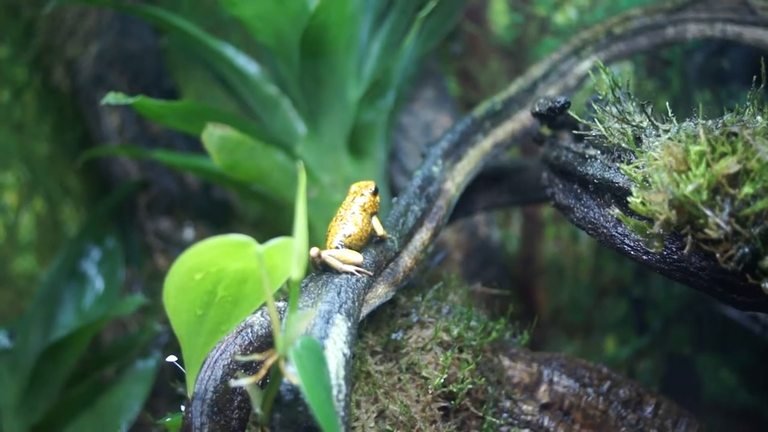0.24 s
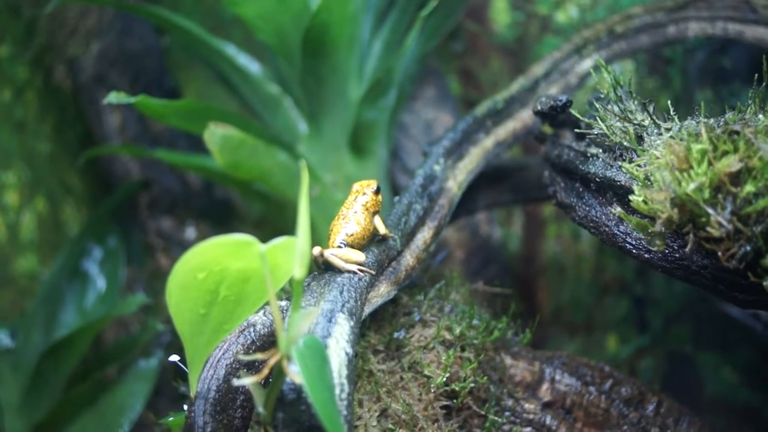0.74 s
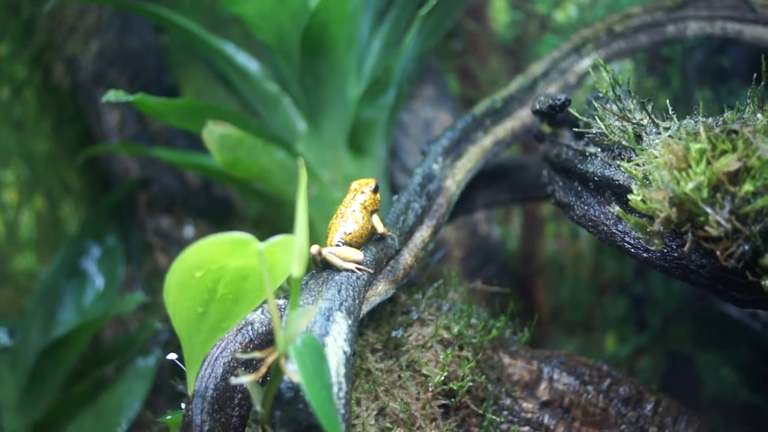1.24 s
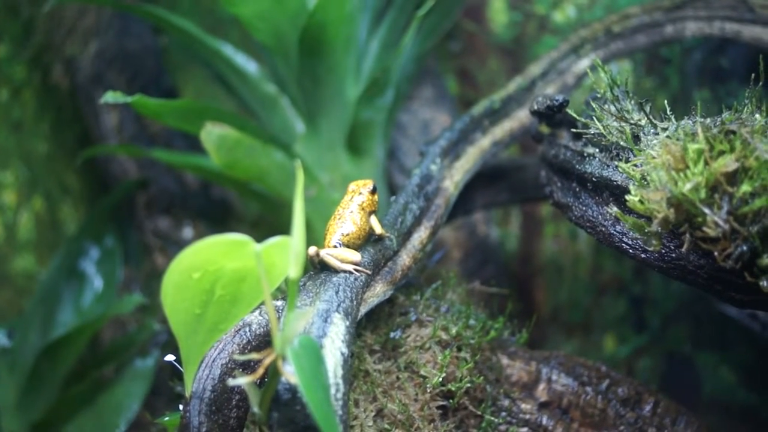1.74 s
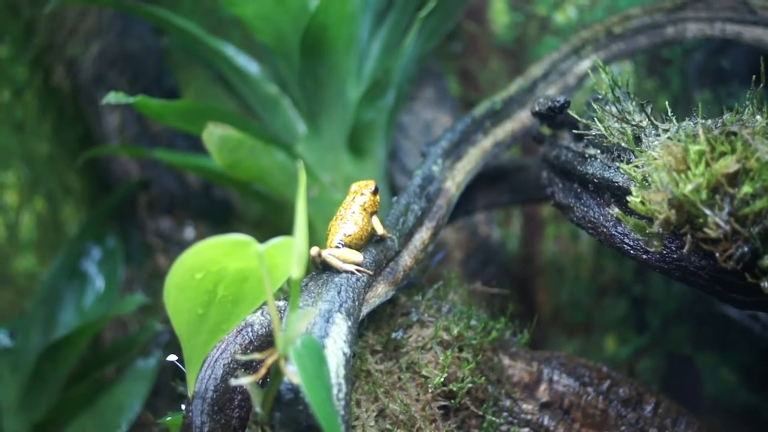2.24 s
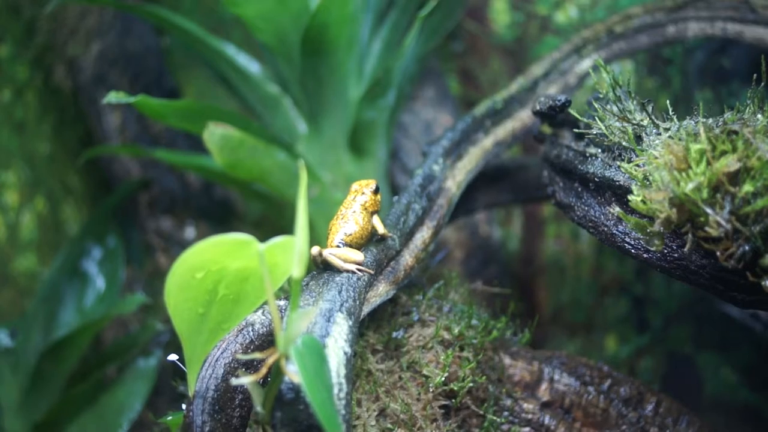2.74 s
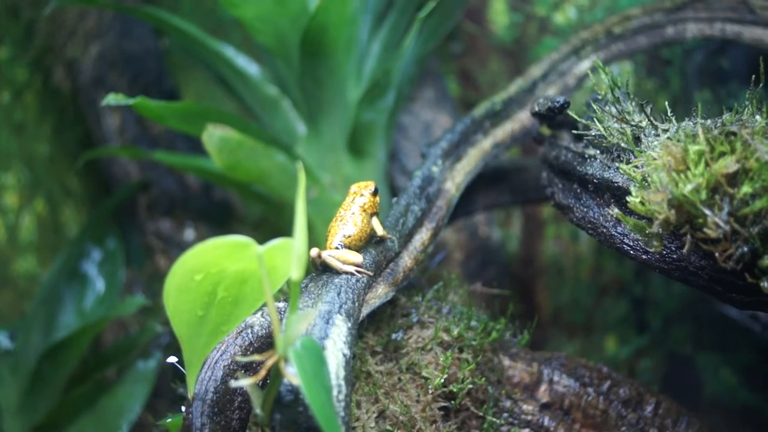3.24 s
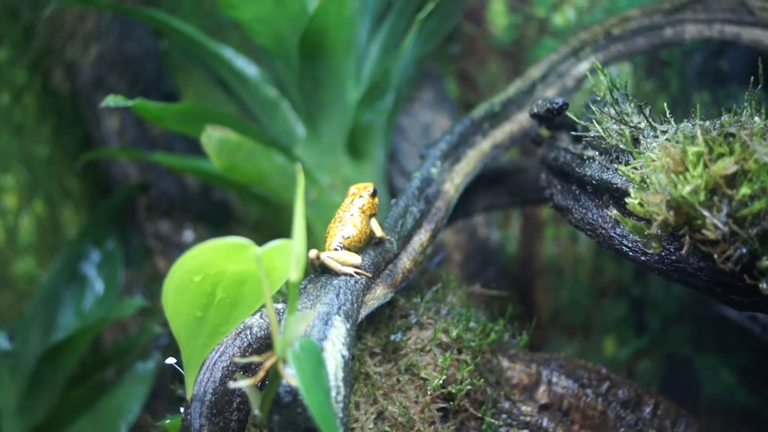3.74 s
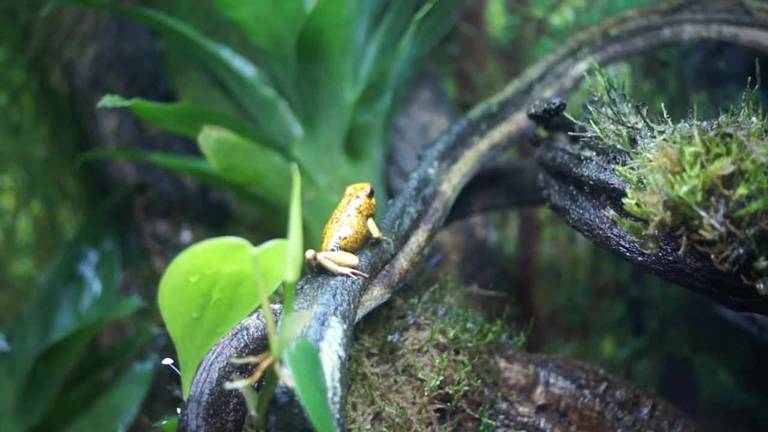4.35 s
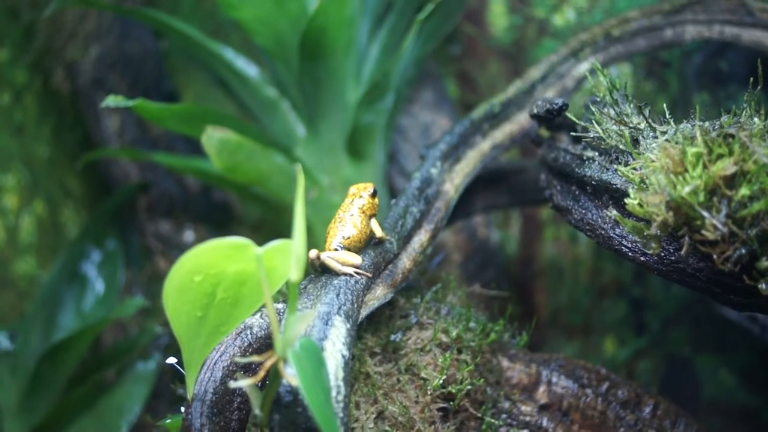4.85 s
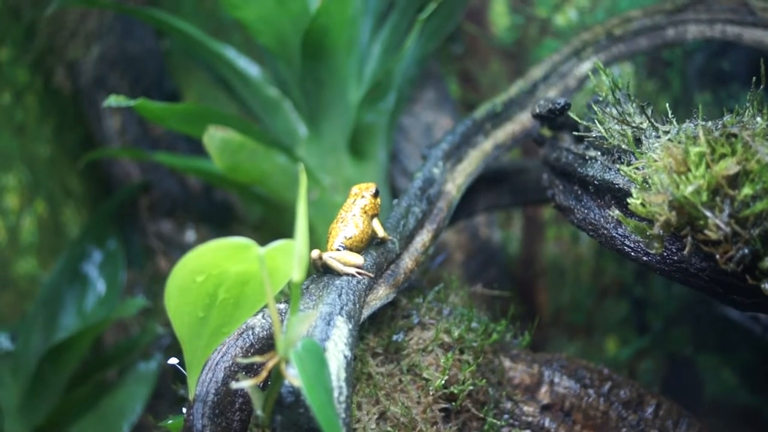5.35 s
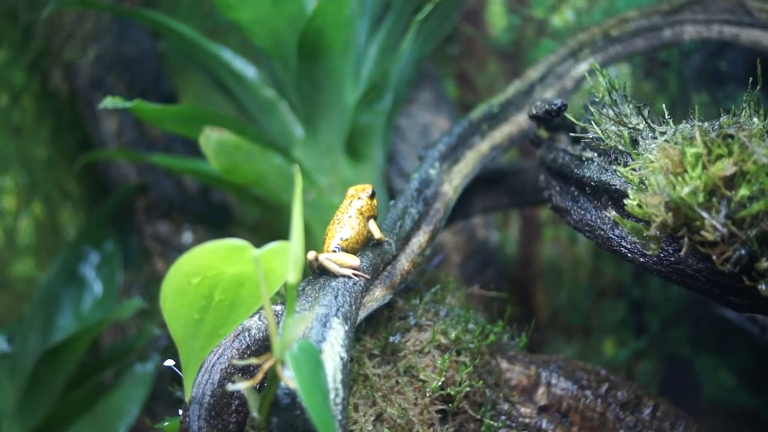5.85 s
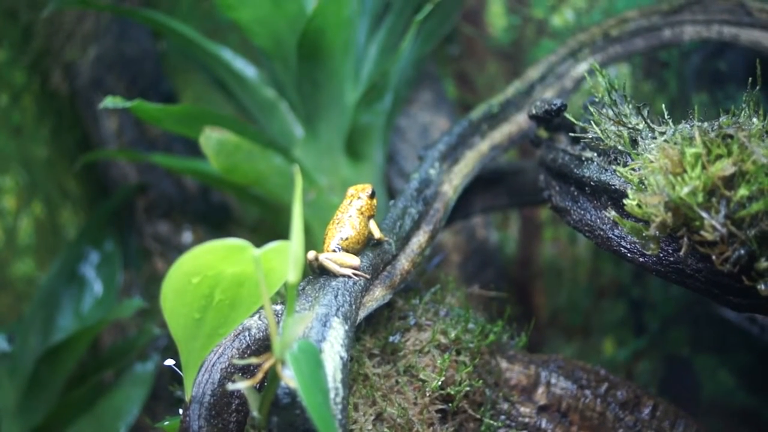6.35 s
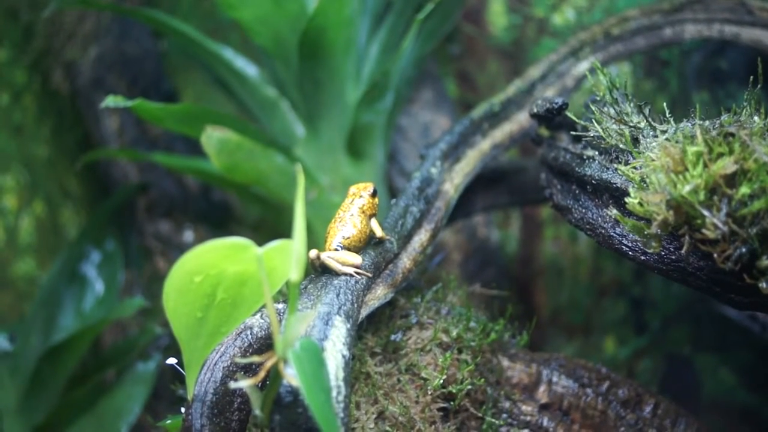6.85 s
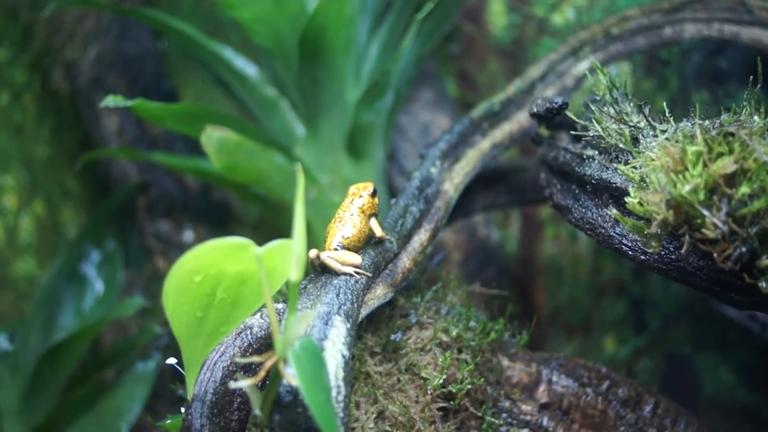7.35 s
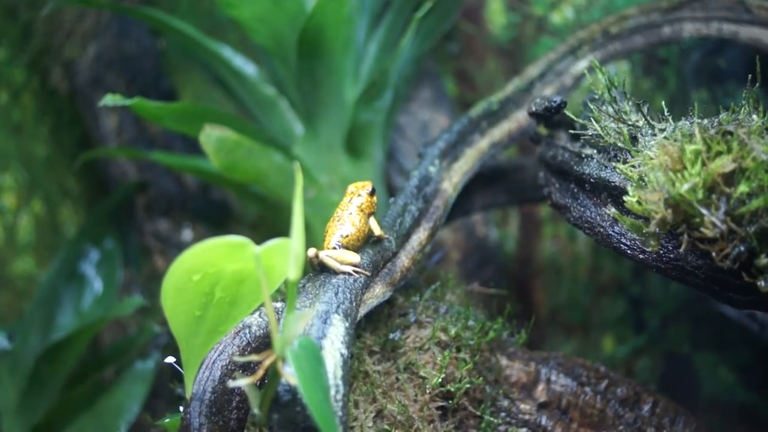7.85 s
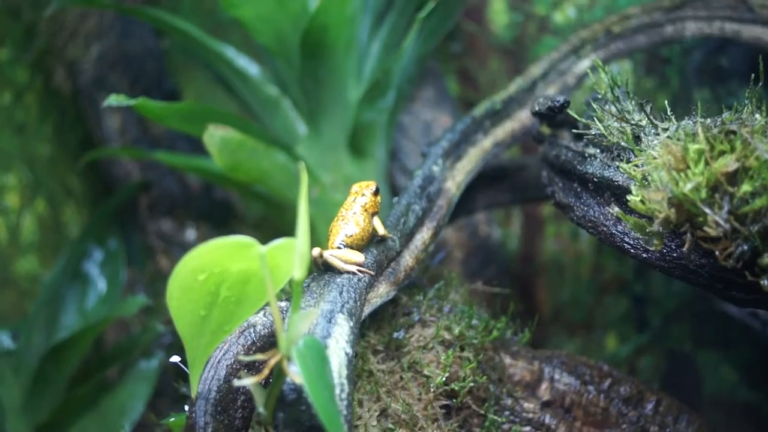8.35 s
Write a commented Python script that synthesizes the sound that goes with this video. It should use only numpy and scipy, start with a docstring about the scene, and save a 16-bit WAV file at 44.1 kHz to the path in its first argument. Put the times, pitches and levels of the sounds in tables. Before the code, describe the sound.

A small frog in a glass terrarium repeats short, high, raspy chirps in a fast, even rhythm over a faint fan.

```python
"""A small frog on a branch in a glass terrarium rasps about five times a second.
Each rasp is a swelling, quickening train of vocal-cord slaps mixed with air noise. This source is
filtered by the resonances of throat and tank, joined by puffs of air and a faint rising resonance,
and prolonged by the room's reverberation. A fan rushes and hums behind.
The recorder's response has three notches and cuts the highest treble."""
import sys
import numpy as np
from scipy import signal
from scipy.fft import rfft, irfft, next_fast_len
from scipy.io import wavfile

SR = 44100
rng = np.random.default_rng(int(sys.argv[2]) if len(sys.argv) > 2 else 0)


def master(y):
    """Save y as 16-bit WAV."""
    cut = np.clip(np.atleast_2d(y).T, -1, 1)
    pcm = np.round(cut * 32767)  # scale
    wavfile.write(sys.argv[1], SR, pcm.astype(np.int16))


N = 378819

# rasps: start t/s, duration/s, relative level/dB
RASP_TIMES = [(-0.062, 0.091, -1.5), (0.152, 0.098, -2.5), (0.372, 0.089, -1.6), (0.585, 0.098, -2.5),
              (0.805, 0.094, -1.7), (1.02, 0.093, -1.5), (1.233, 0.096, -2.5), (1.446, 0.088, -1),
              (1.664, 0.092, -0.6), (1.881, 0.093, -0.2), (2.094, 0.091, -1), (2.309, 0.089, -1.2),
              (2.514, 0.1, -1.8), (2.735, 0.098, -1.5), (2.951, 0.098, -1.5), (3.169, 0.09, -1.5),
              (3.388, 0.095, -1.6), (3.61, 0.089, -1.6), (3.829, 0.092, 0.2), (4.051, 0.093, 0),
              (4.274, 0.09, 0.5), (4.485, 0.094, -1.5), (4.711, 0.092, -1), (4.93, 0.088, -1),
              (5.146, 0.09, -0.4), (5.361, 0.092, -0.4), (5.57, 0.094, -0.9), (5.792, 0.097, -0.8),
              (6.021, 0.089, -0.5), (6.241, 0.091, -0.2), (6.462, 0.091, -0.7), (6.684, 0.091, 0),
              (6.899, 0.092, 0), (7.115, 0.092, 0.5), (7.333, 0.094, 0), (7.55, 0.085, -0.6),
              (7.76, 0.093, 0), (7.973, 0.097, 0.5), (8.194, 0.09, -1), (8.407, 0.093, 0.2)]
# bands that follow the effort, the vocal sac's most: low f/Hz, high f/Hz, swell/(dB per dB), gain/dB
SWELL_BANDS = [(1320, 2240, 0.65, -0.5), (2400, 3300, 3.5, -4), (2970, 3774, 0.92, -2.5),
               (3978, 5015, 2.2, -3.5)]
# cancellations by reflections off the glass: f/Hz, width/Hz, depth (0-1)
GLASS_NULLS = [(1760, 120, .6), (2245, 50, .7), (3025, 90, .55), (3172, 70, .8), (3420, 170, .8),
               (4640, 120, .6)]
# resonances of throat and tank: f/Hz, width/Hz, left gain/dB, right gain/dB
TANK_MODES = [(1850, 39, -20, -5), (1934.5, 74, -0.5, -3), (1993, 76, -32, -7), (2086, 40.6, -4, -4),
              (2150, 120, -9, -5.5), (2312, 144, -13.5, -11.5), (2388, 60, -20, -18), (2441, 95, -7.5, -3),
              (2493, 46, -2, -0.5), (2605.4, 38, -1.5, 0.5), (2636.5, 23, -45, -3), (2701.5, 69, -2, -7),
              (2783, 103, -10, -14), (2897, 44, -2.5, 1), (3010, 100, -17, -29), (3068, 69, -10.5, -8.5),
              (3285, 200, -13, -11.5), (3534, 140, -15.5, -11), (3650, 30, -9, -11),
              (3795, 144, -14.5, -17.5), (3928, 69, -23, -16.5), (4032, 140, -24, -22),
              (4150, 32, -23.5, -16.5), (4260, 120, -31, -20.5), (4403, 140, -22.5, -25),
              (4510, 21, -23, -23), (4840, 35, -28, -33.5)]
# tank modes driven by the upper resonance: f/Hz, width/Hz, left gain/dB, right gain/dB
HIGH_TANK_MODES = [(8440, 20.6, -15, 13.5), (8680, 47, 4.5, -14), (8925, 31, -52.5, 5),
                   (10000, 36, -20, -25), (9146, 49, -18, -43)]
# room modes that ring on after each rasp: f/Hz, width/Hz, left gain/dB, right gain/dB
ROOM_MODES = [(2542, 15, -5, -13), (2700, 57, -11, -13), (2660, 16, -4, -10), (2860, 11, 0, -4),
              (3030, 31, -9, -20)]
# spectrum of the fan's rush: f/Hz, mid spectral level/dB, side relative to mid/dB
RUSH_SPECTRUM = [(30, -114, 10), (65.6, -102, 4), (108, -101, 2), (148, -95, 2.5), (520, -85, 3),
                 (620, -83, 1), (777, -88, 6), (1234, -76, -5), (1454, -79.5, -1), (2120, -88, 0.5),
                 (2400, -101.5, -51), (2760, -88.5, -1), (3300, -104, -1), (3970, -97, 2.5),
                 (4550, -104, 1), (7900, -111.5, 0.5), (11100, -115.5, 1.7), (14800, -120, -5),
                 (15300, -125, 14)]
# course of the fan's rush: t/s, relative level/dB
RUSH_LEVEL = [(0, 0), (6.5, 0), (7.8, 1), (8.59, 1)]
# hum lines of the fan: f/Hz, level/dB, waver rate/Hz
HUM_LINES = [(48, -80, 0.72), (161, -80, 3), (202.7, -74.5, 3.6), (354.6, -72, 4.3), (395.7, -70.5, 1.94)]
# notches in the recorder's response: f/Hz, width/Hz, depth (0-1)
RECORDER_NOTCHES = [(690, 250, .92), (1622, 1750, .972), (9840, 500, .85)]

START_DB, TOP_DB = -15, -5.5      # vocal effort at the foot and top of the swell


def from_db(db):
    """Amplitude ratio for a level in decibels."""
    return 10 ** (np.asarray(db) / 20)


def unit_rms(x):
    """Normalisation to unit mean power."""
    return x / np.sqrt(np.mean(x ** 2) + 1e-20)


def slow_noise(rate_hz):
    """Random fluctuation: unit-power noise through two one-pole low-passes."""
    pole = np.exp(-2 * np.pi * rate_hz / SR)
    return unit_rms(signal.lfilter([1], [1, -2 * pole, pole ** 2], rng.standard_normal(N + SR))[SR:])


def narrowband_noise(phase, rate_hz):
    """Quadrature modulation: two slow noises spread a carrier into a band."""
    return slow_noise(rate_hz) * np.cos(phase) + slow_noise(rate_hz) * np.sin(phase)


def resonance(x, hz, width_hz):
    """Damped resonator: two poles, unit gain at the peak."""
    r = np.exp(-np.pi * width_hz / SR)
    gain = (1 - r * r) / 2
    feedback = [1, -(1 + r * r) * np.cos(2 * np.pi * hz / SR), r * r]
    return signal.lfilter([gain, 0, -gain], feedback, x + 1e-18)


def bandpass(x, low_hz, high_hz):
    """Second-order Butterworth band-pass."""
    return signal.sosfilt(signal.butter(2, [low_hz, high_hz], "band", fs=SR, output="sos"), x + 1e-18)


def modal_response(x, modes):
    """Superposition: each mode resonates with its own strength left and right."""
    return sum(from_db(sides_db)[:, None] * resonance(x, hz, width) for hz, width, *sides_db in modes)


def cancel(x, notches):
    """Destructive interference: subtracting a resonance leaves a notch."""
    for hz, width_hz, depth in notches:
        x = x - depth * resonance(x, hz, width_hz)
    return x


def vocal_cords(progress, jitter=0.07, spread_db=1.2, throb_depth=0.46):
    """Relaxation oscillation: the cords slap ever faster, a little unevenly, and modulate the airflow."""
    rate_hz = np.interp(progress, (0.38, 0.8), (185, 320)) * (1 + jitter * slow_noise(120))
    cycles = np.cumsum(rate_hz) / SR
    onsets = np.diff(progress, prepend=0) < 0
    cycles = cycles - np.maximum.accumulate(cycles * onsets) - 0.4      # first slap 0.4 cycles in
    strikes = np.diff(np.floor(cycles), prepend=0) > 0
    slaps = strikes * np.sqrt(SR / rate_hz) * from_db(spread_db * rng.standard_normal(N))
    throb = 1 + throb_depth * np.cos(2 * np.pi * cycles)
    return unit_rms(slaps), unit_rms(throb)


def voice(slaps, airflow, effort_db, breath_share=0.4, skirt_hz=250):
    """Source and filter: slaps and breath noise excite the resonances of throat and tank."""
    breath = airflow * rng.standard_normal(N)
    source = np.sqrt(1 - breath_share) * slaps + np.sqrt(breath_share) * breath
    drive = 0
    for low_hz, high_hz, swell, gain_db in SWELL_BANDS:
        band = bandpass(unit_rms(source * from_db(swell * effort_db)), low_hz, high_hz)
        drive = from_db(gain_db) * band - drive      # alternating signs join the bands without a gap
    drive = cancel(drive, GLASS_NULLS)
    out = np.zeros((2, N))
    for hz, width_hz, *sides_db in TANK_MODES:
        near_mode = resonance(drive, hz, skirt_hz)      # keeps the valleys between modes deep
        out += from_db(sides_db)[:, None] * resonance(near_mode, hz, width_hz)
    return from_db(-18) * out


def between_panes(x, round_trip_s=0.00517, reflection=0.54):
    """Comb filtering: sound bounces between two glass walls, weaker on every round trip."""
    loop = np.zeros(round(round_trip_s * SR) + 1)
    loop[0], loop[-1] = 1, reflection
    return signal.lfilter([1], loop, x)


def upper_resonance(airflow, progress, from_hz=6550, to_hz=8690):
    """A noise-driven resonance rises and grows as the sac fills, exciting the tank's high modes."""
    glide = np.sin(np.pi / 2 * np.clip(progress / 0.68, 0, 1)) ** 2
    phase = 2 * np.pi * np.cumsum(from_hz + (to_hz - from_hz) * glide) / SR
    fade_in_db = np.interp(progress, (0, 0.086), (-16, 0))
    growth_db = 4.5 * (progress - 1)
    upper = airflow * from_db(-67.5 + fade_in_db + growth_db) * narrowband_noise(phase, rate_hz=420)
    return from_db(-2) * between_panes(upper) + from_db(5) * modal_response(upper, HIGH_TANK_MODES)


def sizzle(airflow, effort_db, hz=13500, width_hz=350):
    """Resonant filtering of air noise: a thin, high hiss that follows the effort."""
    noise = airflow * from_db(effort_db - 56) * rng.standard_normal((2, N))
    return resonance(resonance(noise, hz, width_hz), hz, 2 * width_hz)


def puffs(airflow, effort_db, elapsed_s, remaining_s):
    """Air noise: an opening puff decays, a leak grows with effort, a closing puff ends the rasp."""
    opening = from_db(-5.5) * np.exp(-elapsed_s / 0.013)
    leak = from_db(-7 + 1.8 * (effort_db - TOP_DB))
    closing = from_db(3) * np.exp(-np.clip(remaining_s, 0, 1) / 0.0048)
    noise = airflow * from_db(-51) * (opening + leak + closing) * rng.standard_normal((2, N))
    return between_panes(bandpass(noise, 4800, 7280))


def voice_body(airflow, effort_db, swell=4.7):
    """Power-law growth: a faint low band of air noise emerges near full effort."""
    noise = airflow * from_db(swell * effort_db) * rng.standard_normal(N)
    return from_db(-61) * unit_rms(bandpass(noise, 864, 1510))


def frog(open_s=0.0012, shut_s=0.0022):
    """Amplitude modulation: in each rasp the throat opens, effort swells and holds, the throat shuts."""
    t = np.arange(N) / SR
    start_s, duration_s, level_db = np.transpose(RASP_TIMES)
    rasp = np.clip(np.searchsorted(start_s, t) - 1, 0, None)
    elapsed_s = t - start_s[rasp]
    remaining_s = duration_s[rasp] - elapsed_s
    progress = elapsed_s / duration_s[rasp]
    opened = np.clip(elapsed_s / open_s, 0, 1)
    shut = np.clip(-remaining_s / shut_s, 0, 1)
    effort_db = np.interp(progress, (0, 0.76), (START_DB, TOP_DB)) - 33 * (1 - opened) - 0.5 * shut
    gate = from_db(level_db[rasp]) * (shut < 1)
    slaps, throb = vocal_cords(progress)
    airflow = gate * throb
    tapered_flow = airflow * opened * (1 - shut) ** 2
    return (voice(gate * slaps, airflow, effort_db)
            + upper_resonance(tapered_flow, progress)
            + sizzle(airflow, effort_db)
            + puffs(tapered_flow, effort_db, elapsed_s, remaining_s)
            + voice_body(airflow, effort_db))


def room(x, delay_s=0.03, t60_s=0.23, rise_s=0.022):
    """Reverberation: a late return rings in narrow room modes over an exponentially decaying tail."""
    mono = x.mean(axis=0)
    late = np.pad(mono, (round(delay_s * SR), 0))[:N]
    t = np.arange(SR // 2) / SR
    envelope = from_db(-60 * t / t60_s) * (1 - np.exp(-t / rise_s))
    decay_energy = t60_s * SR / (6 * np.log(10))
    tail = from_db(-7) / np.sqrt(decay_energy) * envelope * rng.standard_normal((2, len(t)))
    return modal_response(late, ROOM_MODES) + signal.fftconvolve(mono[None], tail, axes=1)[:, :N]


def fan_rush(flicker_db=1.2):
    """Broadband noise: independent mid and side signals make a wide, slightly flickering rush."""
    size = next_fast_len(N)
    log_hz = np.log(np.maximum(np.arange(size // 2 + 1) * SR / size, 1))
    hz, mid_db, side_db = np.transpose(RUSH_SPECTRUM)
    gains = from_db([np.interp(log_hz, np.log(hz), db) for db in (mid_db, mid_db + side_db)])
    white = rfft(rng.standard_normal((2, size))) * np.sqrt(SR / 2)
    mid, side = irfft(white * gains, size)[:, :N]
    level_db = np.interp(np.arange(N) / SR, *np.transpose(RUSH_LEVEL)) + flicker_db * slow_noise(5.9)
    return np.array([mid + side, mid - side]) * from_db(level_db)


def fan_hum():
    """Line spectrum: each hum tone wavers at random in amplitude and phase."""
    t = np.arange(N) / SR
    hum = sum(from_db(db) * narrowband_noise(2 * np.pi * hz * t, waver) for hz, db, waver in HUM_LINES)
    return signal.sosfilt(signal.butter(2, 35, "high", fs=SR, output="sos"), hum)


def scene():
    """Superposition of the frog, its reverberation and the fan, which is slightly louder on the right."""
    rasps = frog()
    fan_balance = from_db([[-0.535], [0.535]])
    return rasps + room(rasps) + fan_balance * (fan_rush() + fan_hum())


def record(dry):
    """Linear filtering: three notches, then a steep low-pass that stops all above 15.8 kHz."""
    lowpass = signal.cheby2(20, 60, 15800, fs=SR, output="sos")
    return signal.sosfilt(lowpass, cancel(dry, RECORDER_NOTCHES))


dry = scene()
out = record(dry)
master(out)
```